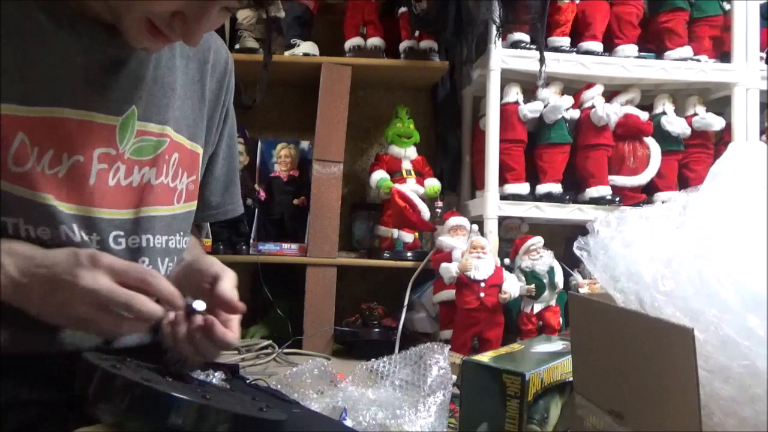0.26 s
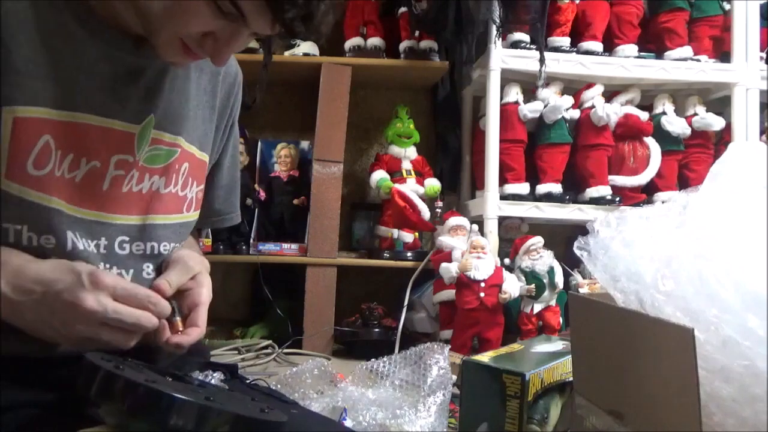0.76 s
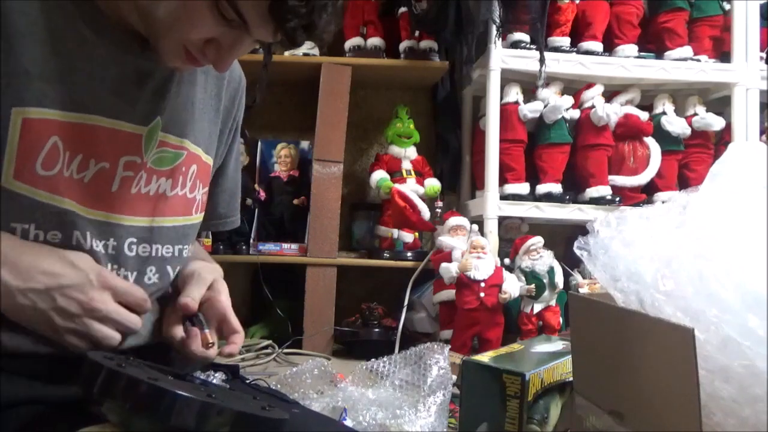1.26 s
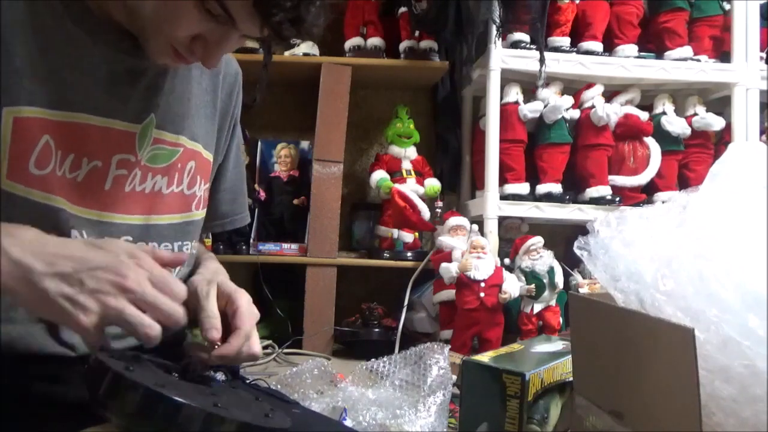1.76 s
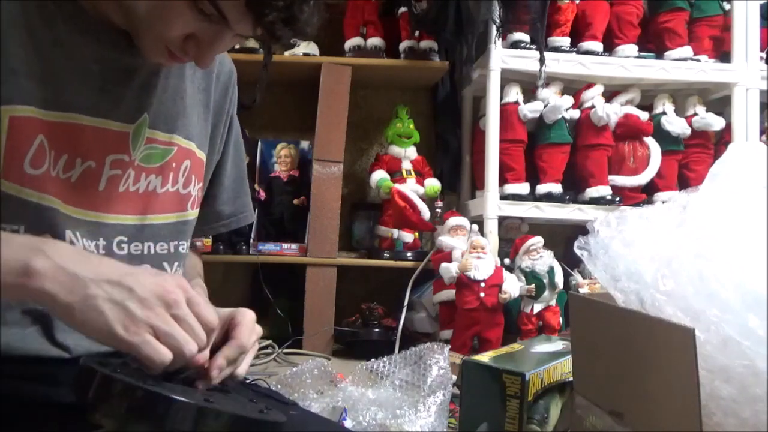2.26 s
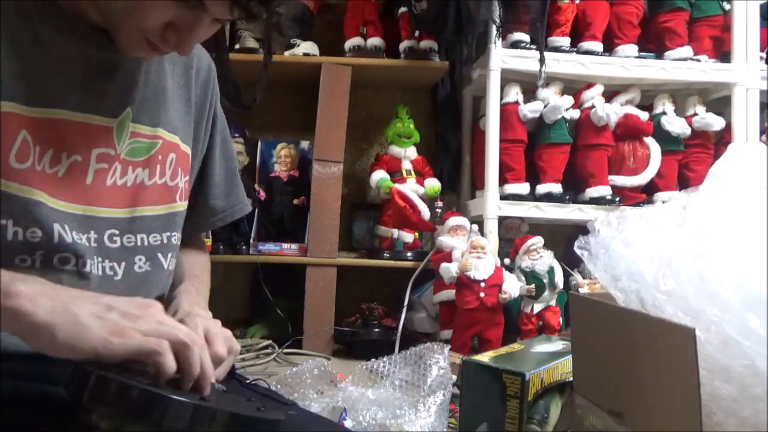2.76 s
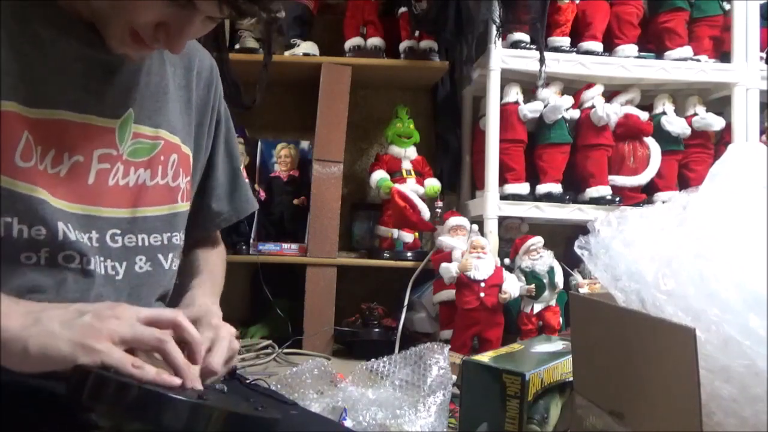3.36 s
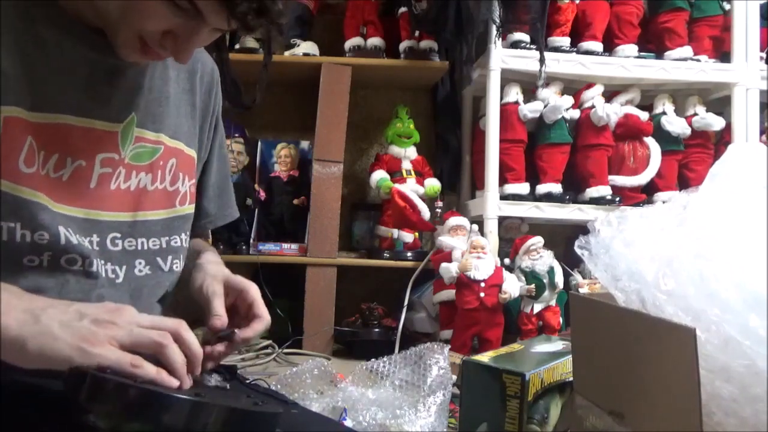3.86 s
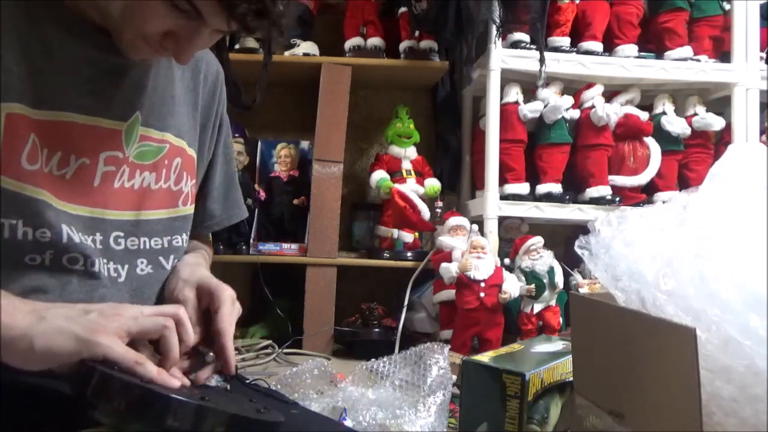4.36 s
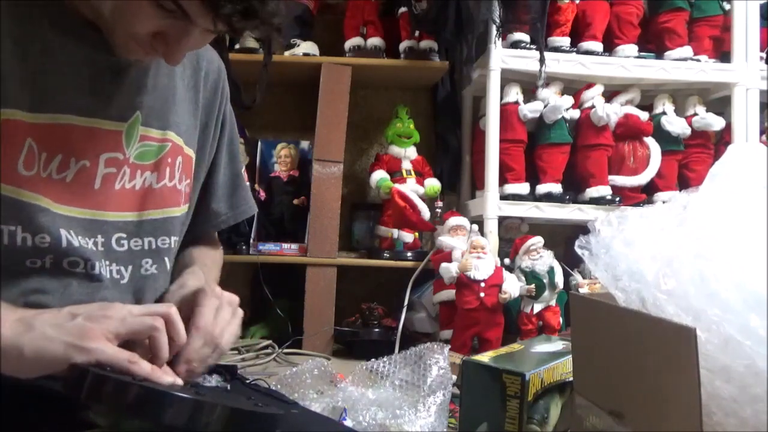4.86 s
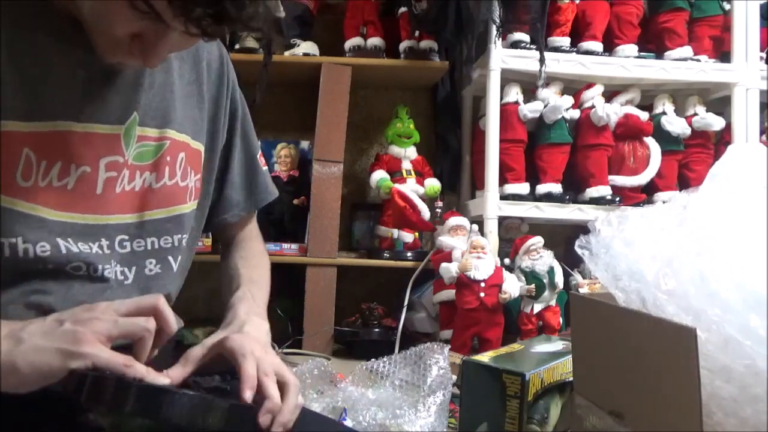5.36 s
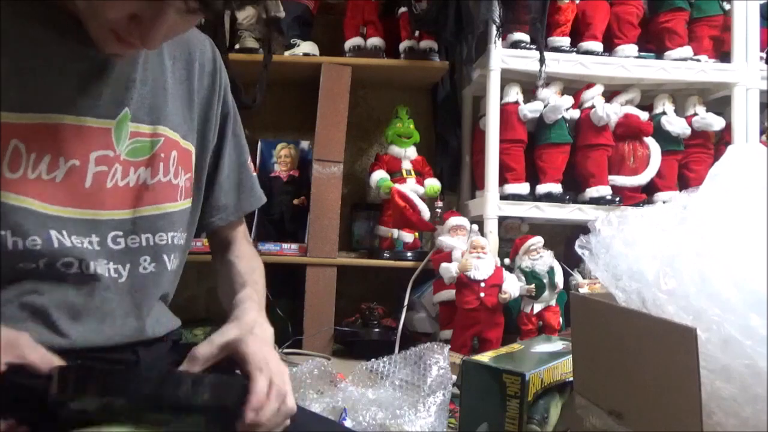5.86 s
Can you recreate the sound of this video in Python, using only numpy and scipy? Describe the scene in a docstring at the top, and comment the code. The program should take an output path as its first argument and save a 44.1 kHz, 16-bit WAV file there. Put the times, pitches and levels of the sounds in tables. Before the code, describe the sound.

A quiet small room, with steady soft microphone hiss and a barely audible low hum. Light rubbing and a few small, thin ticks occur in the first 0.7 seconds, the clearest near 0.3. Then it is almost silent until a hollow click at 2.0. From 2.3 to 3.15 hands press batteries into a plastic base: irregular hard clacks and rattles, mid-pitched and briefly ringing, with short scrapes between, strongest around 2.7 and 3.0 to 3.15. Softer knocks follow at 3.45 to 3.85, then crisp snaps at 4.05, 4.3 and 4.4. Lower, duller taps and a brief scrape lead to a bright click at 4.9. A tight burst of loud snaps comes at 5.2 to 5.35. After that, skin and cloth brush the shell, swelling near 5.7 and 5.9 as it slides away, with tiny light clicks around 6.0. Close, dry stereo, slightly dull at the very top.

```python
"""A small, cluttered, quiet room, where hands press batteries into the compartment of a hollow plastic base.
Each snap is an impulsive contact that excites the damped modes of the shell: a sharp crack that rings.
Between the snaps fingers and cloth rub the shell: random slips shake its modes, skin and cloth hiss along.
A wavering mains hum and the steady, partly coherent hiss of the microphones lie underneath."""
import sys
import numpy as np
from scipy import signal
from scipy.fft import rfft, irfft
from scipy.io import wavfile
from scipy.ndimage import uniform_filter1d

SR = 44100
rng = np.random.default_rng(int(sys.argv[2]) if len(sys.argv) > 2 else 0)


def transcribe(u):
    """Save the signal u as a 16-bit wav file named by the first command-line argument.

    u: samples, shape (n,) or (channels, n), limited to [-1, 1]; the rate is SR.
    q: integer samples, one column per channel.
    """
    v = np.clip(np.atleast_2d(u).T, -1, 1)
    q = np.round(v * 32767).astype(np.int16)
    wavfile.write(sys.argv[1], SR, q)


def ratio(d):
    """dB to gain"""
    e = np.asarray(d, float) / 20
    return 10 ** e


N = 269892

# Snaps and taps, soft blows low and hard ones high; levels are relative to one another:
# (time [s], knock level [dB], knock pitch [Hz], spread of the knock [octaves], level of the metal tick [dB])
SNAPS = [(0.091, -61, 4920.0, 2.52, -57), (0.132, -48.0, 1030.0, 1.17, -43), (0.317, -38, 3180, 0.71, -49),
         (0.41, -47, 3300.0, 1.1, -56), (0.643, -69.1, 1610.0, 2.24, -60), (1.043, -79, 690.0, 2.47, -61.6),
         (1.115, -74, 600.0, 2.6, -60), (1.691, -49.5, 530.0, 1.13, -74), (1.987, -28, 1295, 1.16, -54),
         (2.086, -49, 350.0, 2.45, -75.9), (2.163, -46, 583, 1.5, -60.5), (2.301, -29.5, 920.0, 1.41, -56),
         (2.345, -27, 345, 2.42, -49.9), (2.388, -39.5, 1540.0, 1.24, -41.5), (2.411, -42, 350.0, 1.9, -71),
         (2.42, -40, 560.0, 0.75, -52), (2.478, -43.4, 1440, 1.07, -52.2),
         (2.513, -25.5, 1230.0, 1.37, -42.5), (2.633, -39.5, 736, 2.65, -54), (2.65, -38, 930, 0.71, -62),
         (2.73, -18.5, 1050, 1.42, -38.5), (2.753, -35, 680.0, 3.05, -47.9), (2.79, -44, 540.0, 2.5, -79),
         (2.869, -28, 1150, 1.34, -55.1), (2.915, -21.5, 1490.0, 1.81, -54), (2.984, -57, 830.0, 1.2, -53),
         (3.02, -16, 935, 1.13, -29), (3.068, -47.5, 2900, 1.8, -49), (3.093, -36, 1560, 0.6, -55),
         (3.105, -19.5, 1300, 1.29, -25.4), (3.144, -19, 1490.0, 1.66, -31.5),
         (3.392, -62, 2210.0, 2.55, -57), (3.461, -41.5, 350.0, 2.9, -77.8), (3.471, -33, 840, 0.91, -60),
         (3.521, -33.5, 915, 2.21, -85.0), (3.607, -41.5, 1360, 1.3, -51), (3.616, -30.5, 660, 1.92, -58),
         (3.8, -44, 350.0, 2.7, -53.6), (3.831, -45.5, 705, 1.4, -78), (4.059, -21.5, 1170, 1.77, -39.5),
         (4.216, -58.5, 1630, 1.4, -60), (4.263, -57, 1130, 2.6, -56.5), (4.308, -22, 1290.0, 1.99, -26.5),
         (4.385, -46, 1490.0, 1.8, -47), (4.393, -20.5, 1500, 2.16, -32.5), (4.553, -32, 880, 1.5, -64),
         (4.616, -57, 1930.0, 2.5, -85.0), (4.691, -38.5, 493, 3.07, -68), (4.73, -53.5, 1330.0, 1.8, -53),
         (4.858, -42.5, 630.0, 2.96, -85.0), (4.881, -32.5, 350.0, 1.06, -60),
         (4.888, -44, 520.0, 1.9, -85.0), (4.911, -25, 1410, 1.22, -43), (4.933, -37, 4280.0, 0.55, -38.5),
         (5.032, -57.5, 1470.0, 2, -77.0), (5.102, -54.5, 1100.0, 1.3, -76),
         (5.19, -19.5, 1590, 1.24, -40.5), (5.241, -16.5, 1510.0, 1.04, -36.5),
         (5.29, -47.0, 1550.0, 1.61, -56.0), (5.325, -22, 1520, 1.09, -36), (5.33, -20, 1430, 1.49, -27),
         (5.333, -17.5, 1310, 0.86, -24.5), (5.485, -65, 530.0, 2.0, -57), (5.584, -63, 2950.0, 2.1, -83),
         (5.737, -45, 930.0, 0.71, -53), (5.998, -45, 1520.0, 1.09, -60), (6.015, -48.5, 970.0, 1.7, -50.5),
         (6.029, -44, 1450.0, 1.2, -51), (6.037, -48.5, 580.0, 1.8, -74), (6.044, -51, 1360.0, 0.91, -71.1)]
# Centres of the bands in which a blow is shaped: (frequency [Hz])
BLOW_HZ = [450, 1000, 2000, 3600, 8000]
# Modes of the free plastic shell: (frequency [Hz], bandwidth [Hz], relative level [dB])
SHELL_MODES = [(362, 19, 7), (465.7, 20.7, 11), (540, 20.7, 17), (696.6, 70, 17), (759.5, 21, 17.5),
               (944.5, 27.4, 18.5), (1063, 22, 1.5), (1098, 11.8, 5.5), (1328, 12.4, 4), (1375, 21.4, 0),
               (1706, 51, 9), (2040, 540, 4), (1910, 160, -30), (2180, 38, 4), (2960, 28, -7),
               (2730, 220, 14.5), (3067, 110, 14.5), (3400, 340, 19.5), (3940, 90, 5), (4800, 28, 1.5),
               (5600, 550, -25), (6100, 600, -33), (8830, 140, 10), (9800, 260, -7), (10250, 160, -14)]


def evened(x):
    """Normalisation: scales a signal to unit rms."""
    return x / np.sqrt(np.mean(x ** 2) + 1e-20)


def read(points, hz, axis=1):
    """Interpolates one column of a table of (frequency [Hz], values) along a logarithmic frequency axis."""
    columns = np.transpose(points)
    return np.interp(np.log(hz + 1), np.log(columns[0] + 1), columns[axis])


def add(mix, s, sound):
    """Superposition: adds a sound to the mix from second s on."""
    part = mix[round(s * SR):][:len(sound)]
    part += sound[:len(part)]


def colour(x, points):
    """Zero-phase filtering: weights the spectrum by a table of (frequency [Hz], gain [dB])."""
    hz = np.fft.rfftfreq(x.shape[-1], 1 / SR)
    return irfft(rfft(x) * ratio(read(points, hz)), x.shape[-1])


def causal(points, size=4096):
    """Minimum phase: the Hilbert transform of the log gain gives the shortest causal pulse of that colour."""
    log_gain = np.log(ratio(read(points, abs(np.fft.fftfreq(size, 1 / SR)))))
    spectrum = np.exp(np.conj(signal.hilbert(log_gain)))
    return np.fft.ifft(spectrum).real[:size // 2]


def floor():
    """Stationary noise of given interchannel coherence, plus a sinusoidal mains hum of wavering level."""
    # Spectrum of the microphone hiss: (frequency [Hz], relative level per Hz [dB])
    hiss_colour = [(12, -46), (20, -17), (42, -12.5), (64, -6.5), (107, -8.5), (168, -12.5), (996, -15),
                   (1110, -11.5), (1200, -17.5), (1840, -18), (4300, -23.5), (10100, -27), (11500, -34),
                   (15000, -77), (22000, -120)]
    # Likeness of the hiss at the left and right ports: (frequency [Hz], correlation [-1 to 1])
    hiss_likeness = [(60, 0.87), (130, 1), (270, 0.51), (570, -0.046), (1200, -0.087), (2540, 0.3),
                     (5360, 0.4), (11300, 0.89)]
    # Mains hum: (frequency [Hz], level about which it wavers [dB rms])
    mains = [(59.2, -73)]
    hiss_db = -67.5  # rms

    frames, hz = N // 512 + 5, np.fft.rfftfreq(2048, 1 / SR)
    a, b, c, d = rng.standard_normal((frames, len(hz), 4)).T
    left, independent = a + 1j * b, c + 1j * d
    same = np.clip(read(hiss_likeness, hz), -1, 1)[:, None]
    right = same * left + np.sqrt(1 - same ** 2) * independent
    z = np.array([left, right]) * ratio(read(hiss_colour, hz))[:, None]
    hiss = evened(signal.istft(z, nperseg=2048, noverlap=1536)[1][:, :N])

    slow_noise = uniform_filter1d(uniform_filter1d(rng.standard_normal(N), 6000), 6000)
    waver_db = 1.0 * evened(slow_noise)
    hum_hz, hum_db = mains[0]
    tone = np.sin(2 * np.pi * hum_hz * np.arange(N) / SR)
    hum = np.sqrt(2) * ratio(hum_db + waver_db) * tone
    return ratio(hiss_db) * hiss + hum


def room(x, tail_db=-8):
    """Reverberation: near echoes and sparse taps of random sign that decay band by band at two points."""
    # Echoes from lap, box and shelves: (delay [s], level [dB])
    echoes = [(.0026, -22.5), (.0052, -15), (.009, -13), (.016, -33)]
    # Tail: (frequency [Hz], t60 [s], relative level [dB], left-right likeness [0 to 1])
    decay = [(324, 0.065, 11.5, 1), (930, 0.077, -16.5, 0.97), (2700, 0.17, -16, 0.46),
             (9200, 0.074, -9, 0.39)]

    taps = np.zeros((2, SR // 2))
    jitter = rng.integers(0, 20, (2, (SR // 2 - 301) // 20))
    at = np.arange(300, SR // 2 - 20, 20) + jitter
    np.put_along_axis(taps, at, rng.choice([-1., 1.], at.shape), axis=1)
    hz, t, z = signal.stft(taps, SR, nperseg=256)
    alike = np.clip(read(decay, hz, axis=3), 0, 1)[:, None]
    z[1] = alike * z[0] + np.sqrt(1 - alike ** 2) * z[1]
    t60 = read(decay, hz)[:, None]
    fade_db = read(decay, hz, axis=2)[:, None] - 60 * t / t60
    tail = signal.istft(z * ratio(fade_db), SR, nperseg=256)[1]
    tail *= ratio(tail_db) / np.linalg.norm(tail, axis=1)[:, None]
    tail[:, 0] = 1  # direct sound
    for s, db in echoes:
        # inverted and smoothed: cloth and card swallow the treble
        tail[:, round(s * SR):][:, :9] -= ratio(db) * np.hanning(9) / 4
    return signal.fftconvolve(x[None], tail, axes=1)[:, :N]


def ports(x):
    """Interaural-like cues: two microphone ports hear the hands with a small shift in phase and level."""
    # The hands sit a little left: (frequency [Hz], left over right [dB])
    port_balance = [(300, .5), (2000, .4), (4000, 1.2), (10000, 2.4)]
    # Phase between the ports: (frequency [Hz], lead of the left [rad])
    port_phase = [(0, -0.16), (690, -0.74), (1290, -0.95), (3100, -0.56), (4130, -0.54), (5680, -0.65),
                  (6720, -0.86), (7150, -2.1), (7410, 0.54), (7670, 1), (9300, -0.85), (9990, -0.4),
                  (10800, -0.71), (11500, -1.5)]
    hz = np.fft.rfftfreq(N, 1 / SR)
    half = ratio(read(port_balance, hz) / 2) * np.exp(.5j * read(port_phase, hz))
    return irfft(rfft(x) * [half, 1 / half], N)


def shell_ring(spot, spot_db, grip, thud=0.28, thud_s=0.0061, size=4096):
    """Modal superposition: the spot struck shares the blow among decaying modes, the grip detunes them."""
    held_hz = 6  # hands and lap widen every mode
    hz, width, db = np.transpose(SHELL_MODES)[:, :, None]
    t = np.arange(size) / SR
    level_draw, pitch_draw, phase_draw = spot[:, :1], spot[:, 1:2], spot[:, 2:]
    tuned_hz = hz * (1 + grip * pitch_draw)
    swing = np.cos(2 * np.pi * tuned_hz * t + 0.33 * phase_draw)
    modes = np.exp(-np.pi * (width + held_hz) * t) * swing
    # the uneven shell splits each mode, so it beats, low modes more slowly
    beat_hz = (55 * np.sign(phase_draw) + 30 * phase_draw) * np.minimum(hz / 900, 1)
    modes *= 1 + .9 * np.sin(2 * np.pi * beat_hz * t)
    settle = 1 + thud * np.exp(-t / thud_s)  # the finger on the shell damps the first swing at once
    return (ratio(db + spot_db * level_draw) * modes).sum(0) * settle


def handling():
    """Envelopes of drag and hiss: powers of resting hands, strokes and the shuffle after each knock add."""
    # Strokes of the hands on the shell, the last ones sliding it off the lap: (strongest moment [s],
    # rise [s], fall [s], drag that shakes the shell [dB rms], dry hiss of skin and cloth [dB rms])
    strokes = [(0.0, .05, 0.17, -66.5, -62.5), (2.286, 0.12, 0.087, -64, -72), (2.42, .05, 0.17, -71, -70),
               (2.5, 0.12, 0.038, -54.5, -65), (2.62, 0.1, 0.035, -50.5, -61.5),
               (2.721, 0.035, 0.046, -54.5, -60.5), (2.83, 0.097, 0.024, -73, -57.5),
               (2.9, 0.077, 0.025, -54.5, -84), (3.07, 0.078, 0.066, -60, -76), (3.38, .15, 0.52, -68, -67),
               (3.51, .1, 0.12, -59, -67), (3.96, 0.11, 0.29, -86, -77), (4.292, 0.054, 0.12, -55.5, -74),
               (4.7, .01, 0.052, -65, -61.5), (4.862, .01, 0.052, -59, -58),
               (4.899, 0.037, .02, -45.5, -61), (5.12, 0.18, 0.28, -67, -67.5),
               (5.27, 0.068, 0.11, -57, -69), (5.51, 0.15, 0.12, -71, -69.5),
               (5.629, 0.035, 0.09, -66.5, -58.5), (5.706, 0.076, 0.074, -61.5, -54.5),
               (5.75, 0.068, 0.17, -77, -58), (5.896, 0.046, 0.12, -54, -50),
               (5.928, 0.063, 0.1, -52, -52.5), (6.04, .15, 0.21, -60.5, -59),
               (6.12, 0.059, .05, -58.5, -65)]
    stroke_db = 20  # a stroke is this much weaker one rise before and one fall after its strongest moment
    away_from_s, away_to_s = .6, 2.2  # the hands leave the shell
    resting_db = (-78.5, -79)  # hands lying on the shell: (drag, hiss)
    # after each knock the loose parts shuffle on: (drag, hiss) below the knock, and their fade
    settle_db, settle_db_per_s = (-26, -36.5), 339

    t = np.arange(0, N + 64, 64) / SR
    s, rise, fall, *peak_db = np.transpose(strokes)[:, :, None]
    shape_db = -stroke_db * np.maximum((s - t) / abs(rise), (t - s) / abs(fall))
    hit_s, knock_db = np.transpose(SNAPS)[:2, :, None]
    fading = ratio(knock_db - settle_db_per_s * abs(t - hit_s))
    after = (fading ** 2 * (t > hit_s)).sum(0)
    touching = (t < away_from_s) | (t > away_to_s)
    envelopes = []
    for db, rest_db, shuffle_db in zip(peak_db, resting_db, settle_db):
        power = (ratio(db + shape_db) ** 2).sum(0)
        power = power + touching * ratio(rest_db) ** 2 + ratio(shuffle_db) ** 2 * after
        envelopes.append(np.interp(np.arange(N) / SR, t, np.sqrt(power)))
    return envelopes


def rubbing(grain_db=5, slips_per_s=1100, clump_db=3.0):
    """Stick-slip friction: clumps of tiny random slips shake the shell while skin and cloth hiss along."""
    # Filter of the shaken shell: (frequency [Hz], gain [dB])
    drag_colour = [(88, -44), (150, -29.5), (250, -20), (336, -15), (596, -14.5), (721, -15.5), (898, -18),
                   (1010, -13.5), (5000, -18), (6500, -71), (11000, -120)]
    # Filter of the hiss of skin and cloth: (frequency [Hz], gain [dB])
    skin_colour = [(710, -8), (1200, -2.5), (2080, 1.5), (2370, -1.5), (4100, -4.5), (5400, -7),
                   (10300, 0.5), (11200, -9), (11500, -13), (15000, -55), (22000, -120)]
    drag, hiss = handling()
    clumps = ratio(clump_db * evened(uniform_filter1d(rng.standard_normal(N), 500)))
    # three fingers, each with its own slips and its own spot on the shell
    happens = rng.random((3, N)) < slips_per_s / SR
    size = ratio(grain_db * np.minimum(rng.exponential(1, (3, N)), 4)) * happens
    slips = size * rng.standard_normal((3, N)) * clumps
    spots = rng.standard_normal((3, len(SHELL_MODES), 3))
    rings = np.array([shell_ring(spot, 2.5, .03) for spot in spots])
    rings[:, 0] += 60  # each slip also ticks drily
    shaken = colour(signal.oaconvolve(slips, rings, axes=1)[:, :N].sum(0), drag_colour)
    skin = colour(clumps * rng.standard_normal(N) + 0.26 * evened(slips.sum(0)), skin_colour)
    return drag * evened(shaken) + hiss * evened(skin)


def levelled(x, size=8192):
    """Spectral whitening: the gains [dB] that give each band of a sound the same power per Hz."""
    hz, power = np.fft.rfftfreq(size, 1 / SR), abs(rfft(x, size)) ** 2
    return np.array([-10 * np.log10(power[(hz > f / 1.4) & (hz < f * 1.4)].mean()) for f in BLOW_HZ])


def blow_db(knock_db, knock_hz, spread, tick_db):
    """Energy addition: a spectral hump round the pitch of the knock plus a tick that rises to the treble."""
    skirt_db = 12  # fall of the knock one spread from its pitch
    tick_hz, tick_db_per_oct = 8000, 9  # the tick fades below tick_hz
    octaves = np.log2(np.divide(BLOW_HZ, knock_hz))
    knock = knock_db - skirt_db * (octaves / max(spread, .3)) ** 2
    tick = tick_db - tick_db_per_oct * np.log2(np.divide(tick_hz, BLOW_HZ))
    return 10 * np.log10(ratio(knock) ** 2 + ratio(tick) ** 2)


def snaps(ring_db=-46, chatter_db=-8, chatter_s=0.0027, rattle_db=-25, rattle_s=0.0031, near_db=34):
    """Impact excitation: a sharp contact, its brief chatter and a loose rattle convolve with the shell."""
    spots = rng.standard_normal((len(SNAPS), len(SHELL_MODES), 3))
    grits = rng.standard_normal((len(SNAPS), 2048))
    t, out = np.arange(2048) / SR, np.zeros(N)
    fade = ratio(chatter_db) * np.exp(-t / chatter_s) + ratio(rattle_db) * np.exp(-t / rattle_s)
    for (s, *hit), spot, grit in zip(SNAPS, spots, grits):
        contact = grit * abs(grit) * fade
        contact[0] = 1  # the first touch
        shell = ratio(ring_db) * shell_ring(spot, 2.5, .014)
        shell[0] += 1  # the contact itself is heard too
        blow = signal.fftconvolve(contact, shell)
        # band levels become levels per Hz
        per_hz_db = blow_db(*hit) + levelled(blow) - 10 * np.log10(np.divide(BLOW_HZ, 1000))
        lowest = per_hz_db[0]
        # a small shell radiates no bass
        bass = [(150, lowest - 32), (230, lowest - 17), (310, lowest - 11), (350, lowest - 2)]
        tone = bass + list(zip(BLOW_HZ, per_hz_db))
        # the blow starts 1.5 ms after its listed time
        add(out, s + .0015, ratio(near_db) * signal.fftconvolve(blow, causal(tone)))
    return out


def scene():
    """Superposition of snaps and rubbing, heard in the room through the two ports, over the floor."""
    return ports(room(snaps() + rubbing())) + floor()


def band_limit(x):
    """A steep low-pass at the top of the band."""
    return signal.sosfilt(signal.butter(12, 11940, fs=SR, output="sos"), x)


def record(dry):
    """Band limitation: a steep low-pass edge shapes the finished mix."""
    # Band limit: (frequency [Hz], gain [dB])
    band_edge = [(20, 6), (11150, 4.5), (11350, -27.5), (12300, -15), (14500, -55), (16000, -90)]
    mix = colour(dry, band_edge)
    return band_limit(mix)


dry = scene()
out = record(dry)
transcribe(out)
```